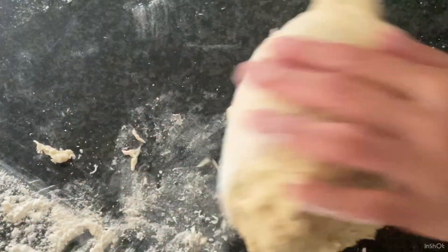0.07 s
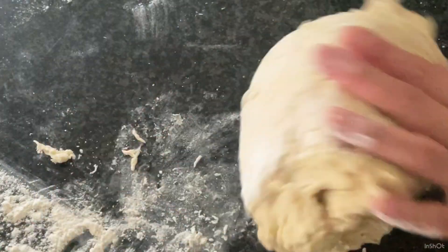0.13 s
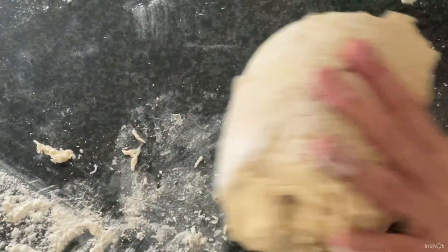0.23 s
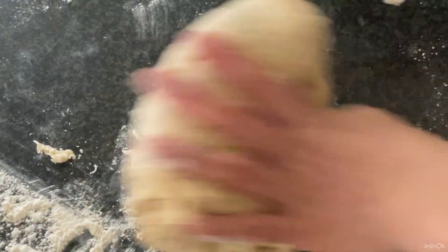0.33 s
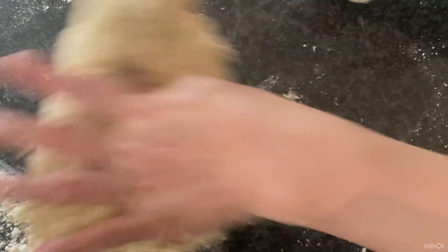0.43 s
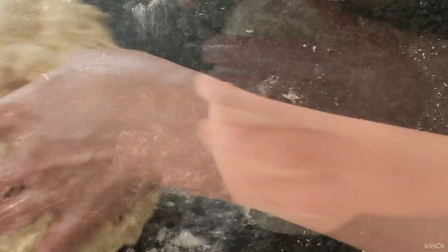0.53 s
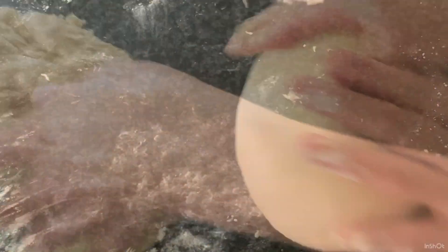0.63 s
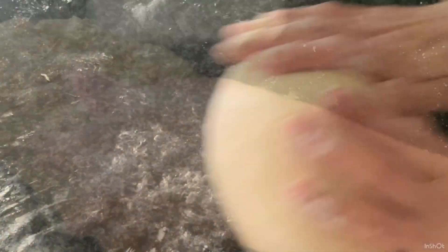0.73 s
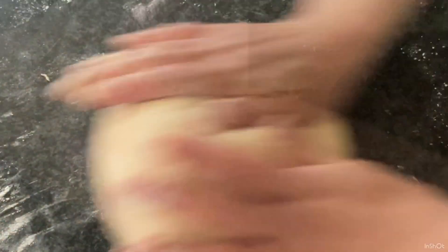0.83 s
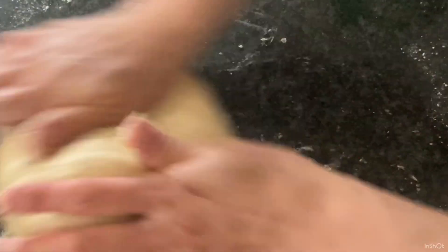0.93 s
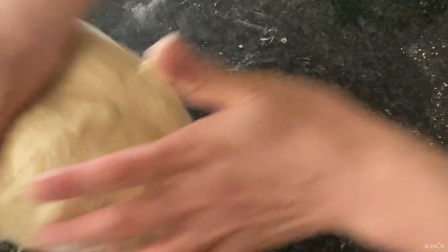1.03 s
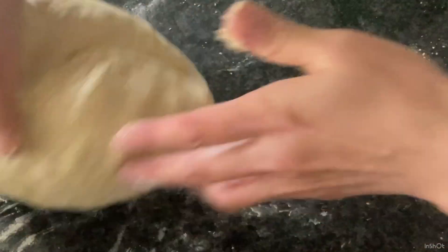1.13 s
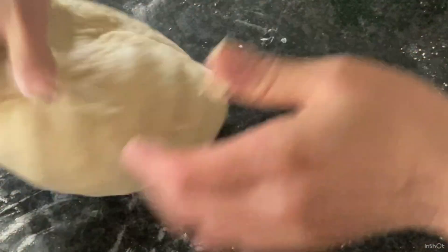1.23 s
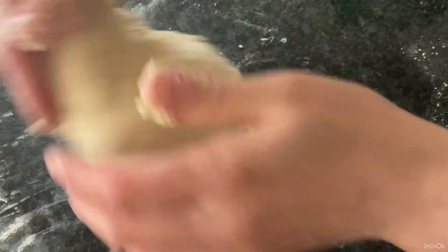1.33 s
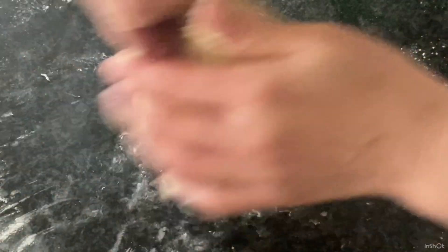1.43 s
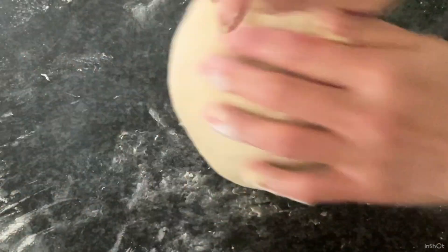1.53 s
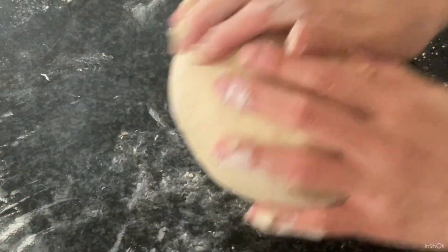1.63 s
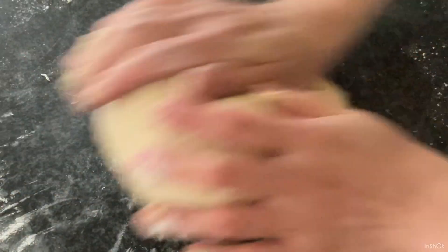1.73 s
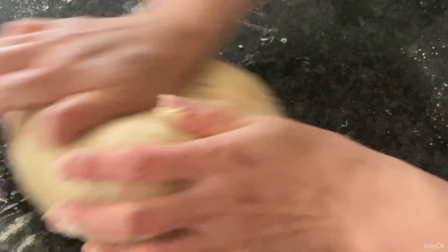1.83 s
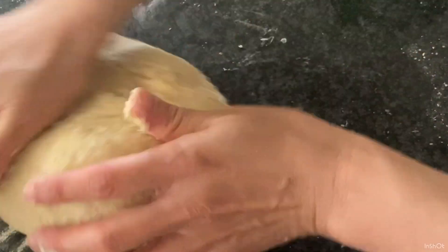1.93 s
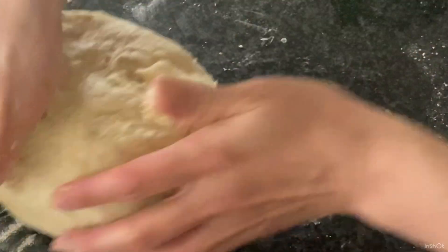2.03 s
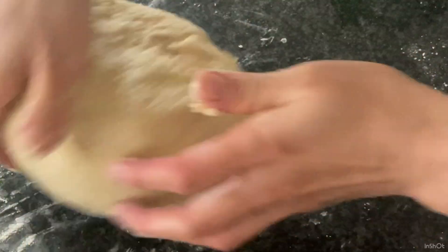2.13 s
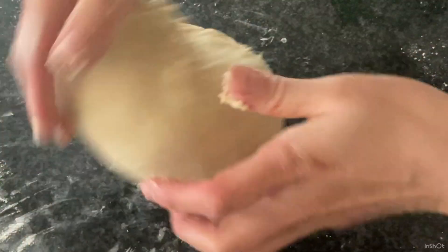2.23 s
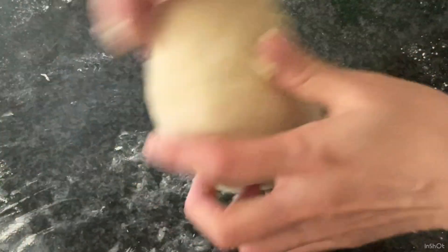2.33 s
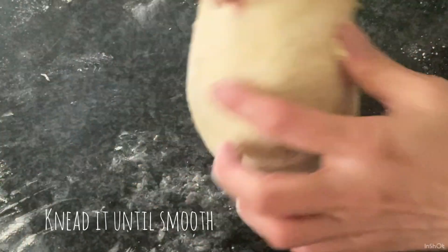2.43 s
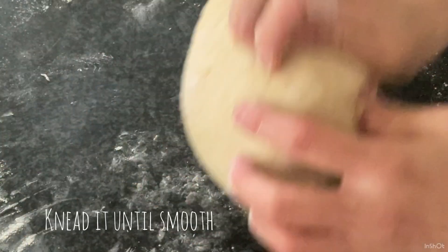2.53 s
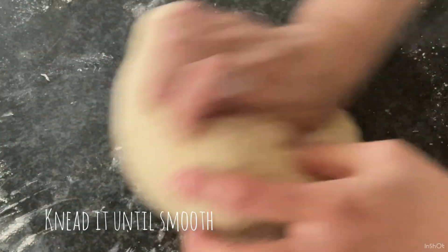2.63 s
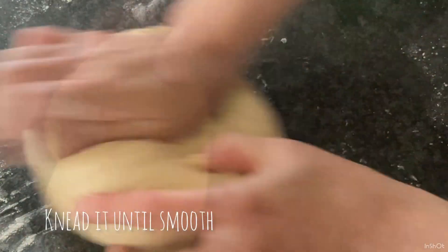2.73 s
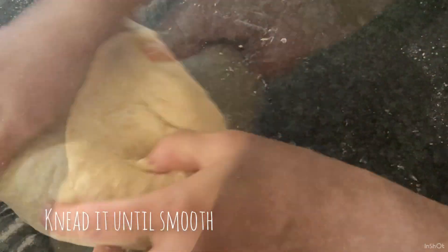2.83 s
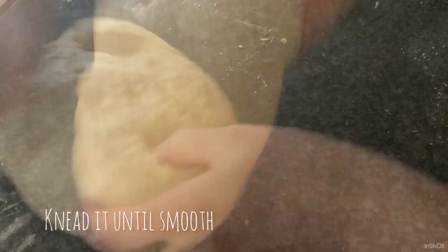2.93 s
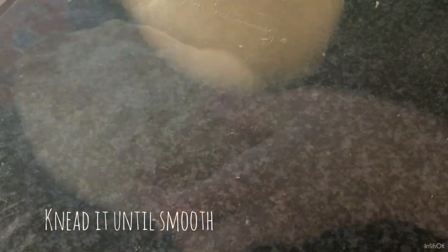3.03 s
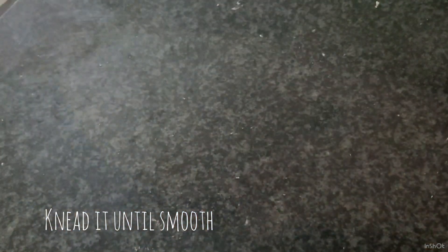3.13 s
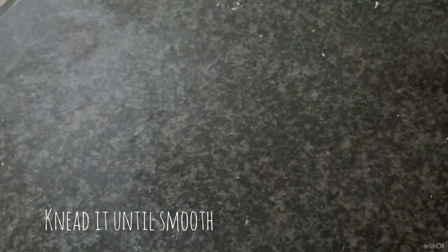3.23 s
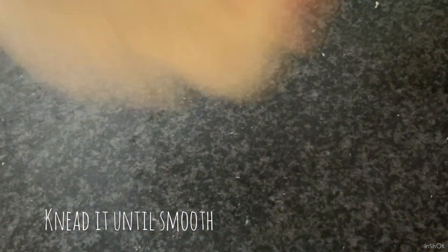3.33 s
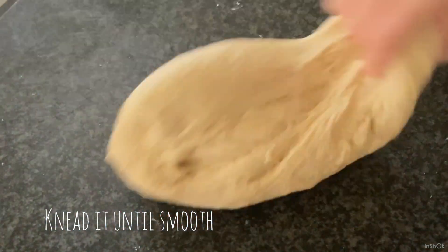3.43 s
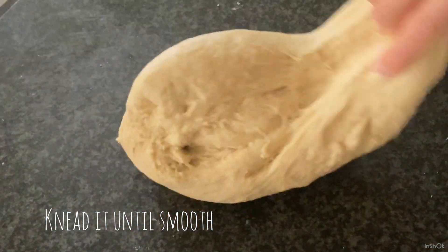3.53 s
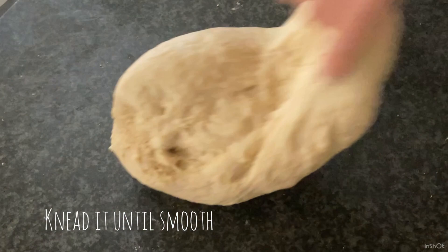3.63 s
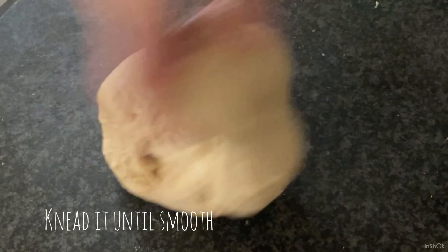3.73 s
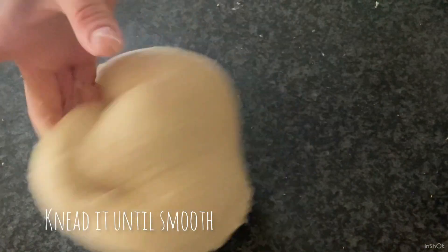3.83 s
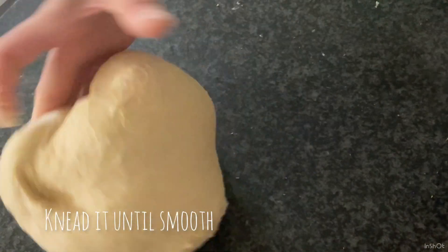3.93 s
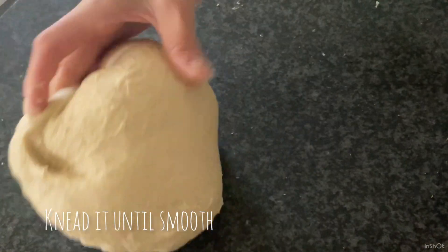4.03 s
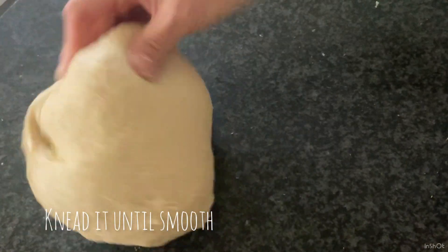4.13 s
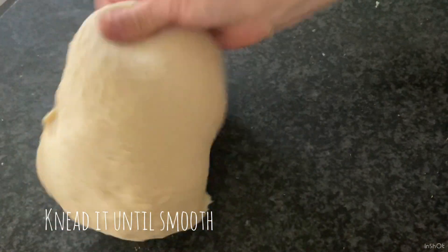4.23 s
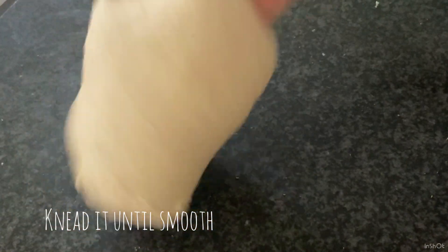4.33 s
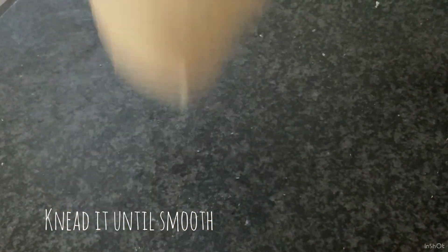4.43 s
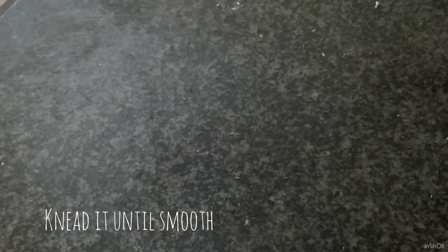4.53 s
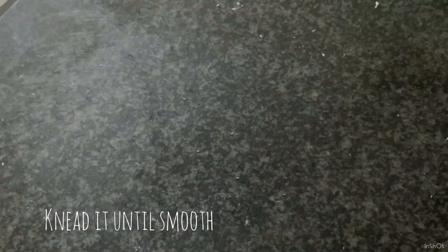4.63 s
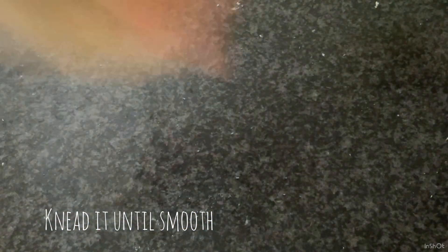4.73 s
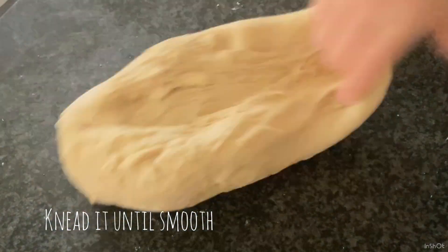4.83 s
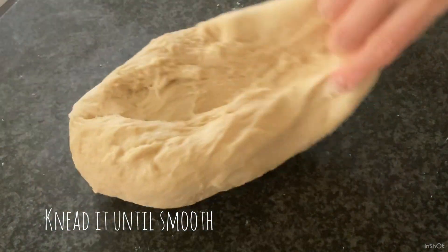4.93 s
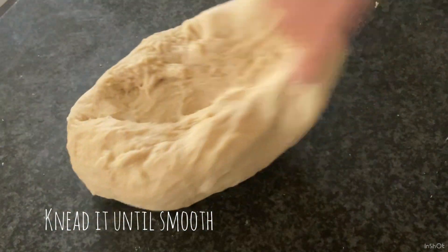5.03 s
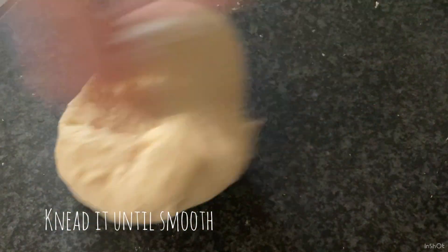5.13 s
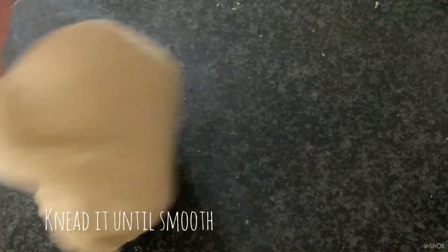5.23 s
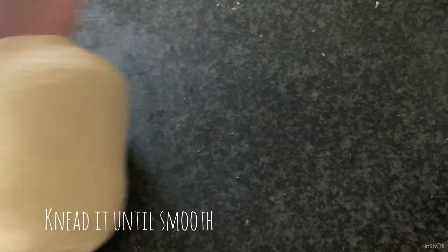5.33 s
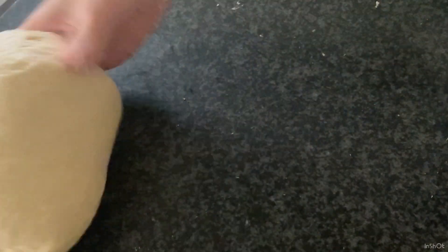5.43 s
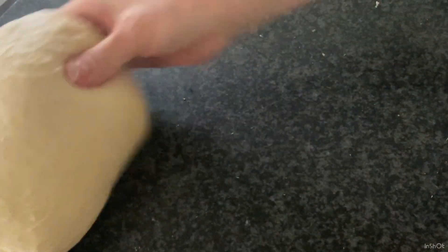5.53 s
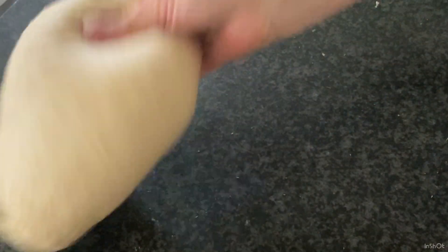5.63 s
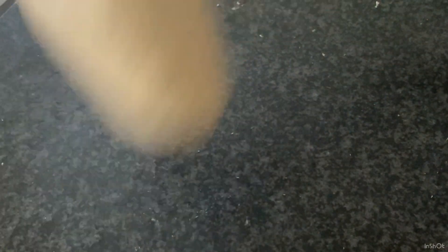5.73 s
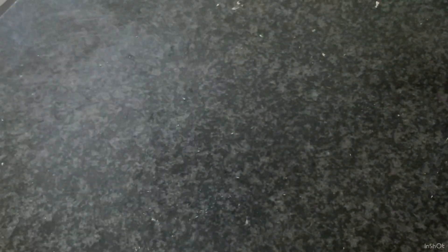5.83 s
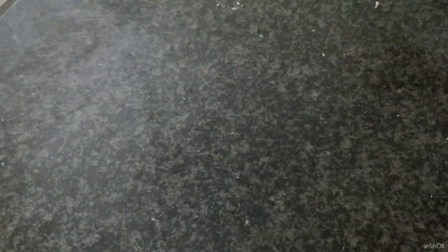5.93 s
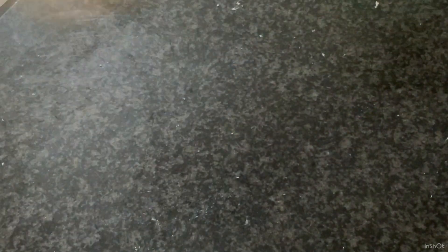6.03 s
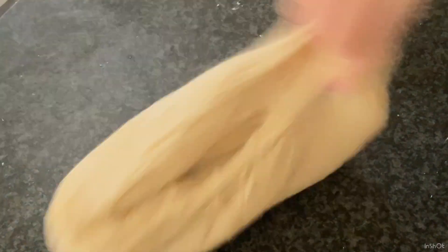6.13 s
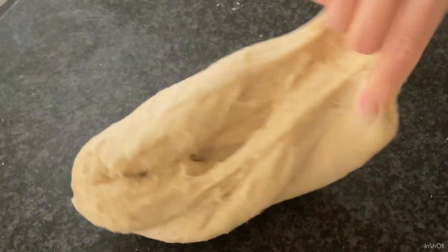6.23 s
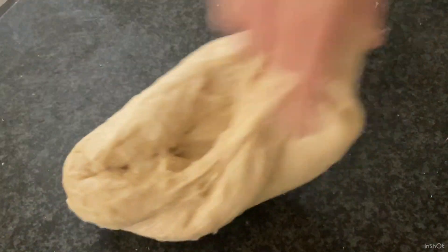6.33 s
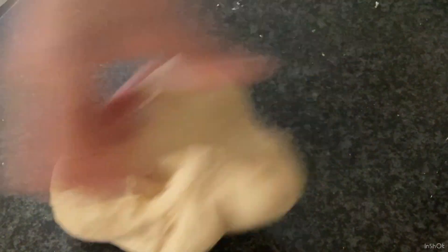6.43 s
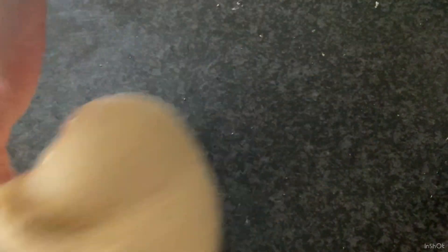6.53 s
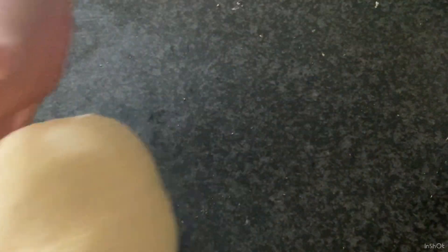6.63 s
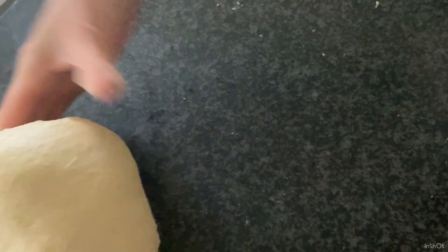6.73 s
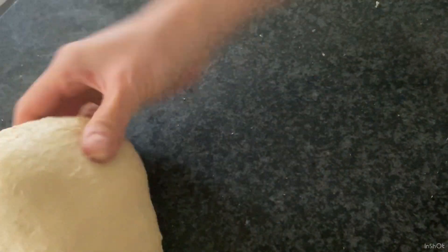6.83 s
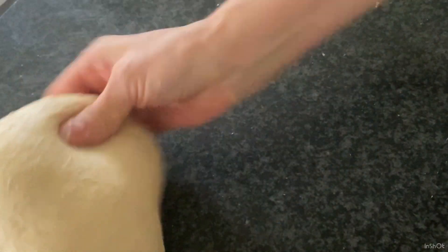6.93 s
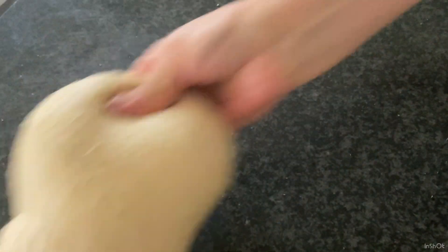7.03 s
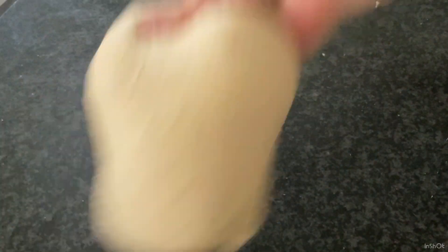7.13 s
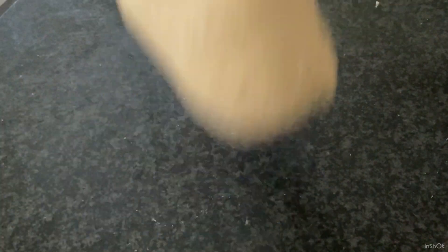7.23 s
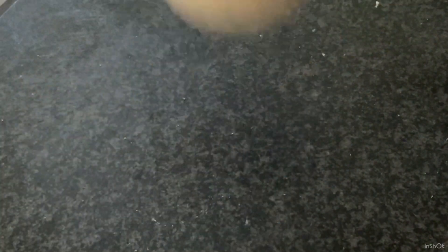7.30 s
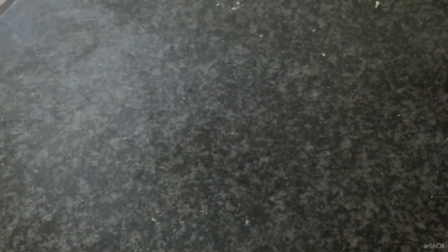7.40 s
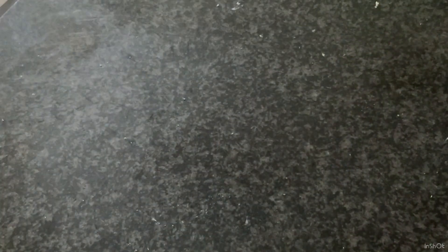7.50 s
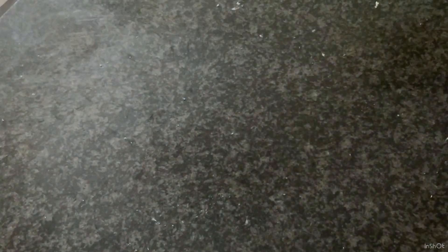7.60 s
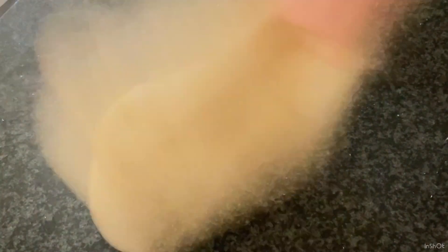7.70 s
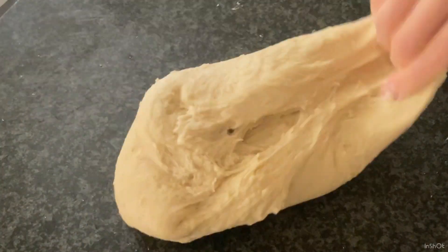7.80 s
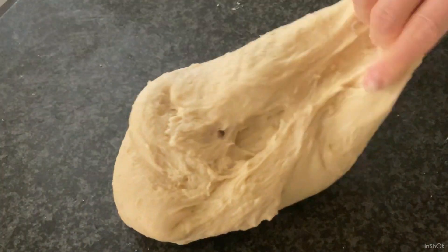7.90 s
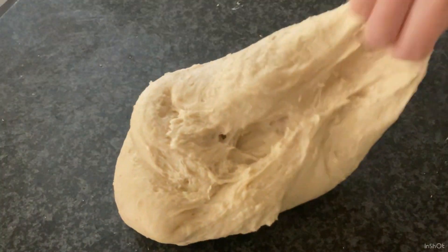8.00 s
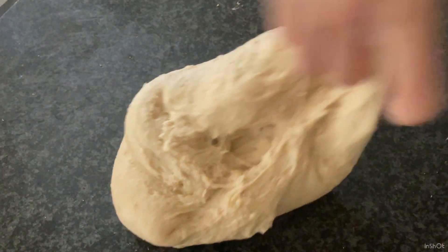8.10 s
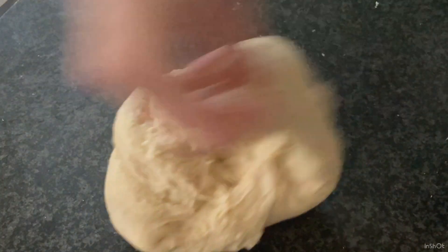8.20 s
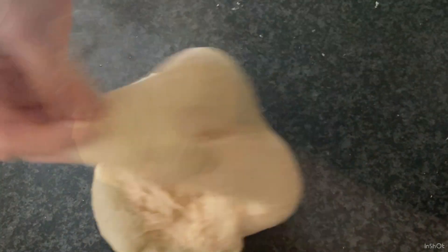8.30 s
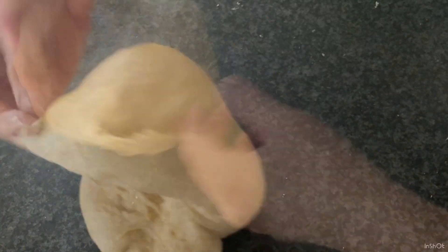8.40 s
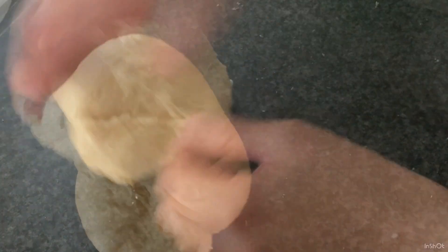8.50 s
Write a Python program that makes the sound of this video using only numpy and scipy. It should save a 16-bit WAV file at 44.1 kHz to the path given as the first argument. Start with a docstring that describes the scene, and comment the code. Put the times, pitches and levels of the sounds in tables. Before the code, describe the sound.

Hands quietly work sticky dough over a faint low hum, followed by four sharp, booming dough slams about a second and a half apart.

```python
"""Soft rubbing, pressing and pats of dough kneaded on a floured stone counter, over a low hum. Then four slams:
noise-burst skin cracks, gliding sine air pops, and a modal counter and room booming under the lump. Hands and
flour are shaped noise; pushed dough groans by stick-slip, and one stretch squeaks. A small hard-walled kitchen
answers with decaying noise in bands; two ports pick it all up."""
import sys
import numpy as np
from scipy import signal
from scipy.fft import rfft, irfft
from scipy.io import wavfile
from scipy.ndimage import uniform_filter1d

SR = 44100
rng = np.random.default_rng(int(sys.argv[2]) if len(sys.argv) > 2 else 0)


def persist_wave(psi):
    """Save psi, clipped to +-1, as 16-bit WAV."""
    counts = np.round(np.clip(psi, -1, 1) * 32767).astype(np.int16)
    wavfile.write(sys.argv[1], SR, np.atleast_2d(counts).T)


N = 377496


def amp(db):
    """Decibels to gain."""
    return 10 ** (np.asarray(db) / 20)


def unit(x):
    """Scale to rms 1."""
    return x / np.sqrt(np.mean(x ** 2))


def clock(length_s):
    """Sample times of a short sound, in s."""
    return np.arange(max(int(length_s * SR), 8)) / SR


def add(track, start_s, sound):
    """Mix a sound into the track at start_s."""
    i = max(int(start_s * SR), 0)
    track[i:i + len(sound)] += sound[:max(len(track) - i, 0)]


def across(points, size):
    """Join (Hz, value) points on a log axis, over the FFT bins of a signal of this size."""
    hz, value = np.transpose(points)
    return np.interp(np.log(np.fft.rfftfreq(size, 1 / SR) + 1), np.log(hz), value)


def band_share(table, centre_hz, size):
    """Weight of one row's band over the FFT bins; neighbouring bands crossfade and sum to 1."""
    return across([(row[0], float(row[0] == centre_hz)) for row in table], size)


def colour(x, points):
    """Filter a signal by (Hz, dB) points."""
    size = x.shape[-1]
    return irfft(rfft(x) * amp(across(points, size)), size)


def hiss(size, lo_hz, hi_hz):
    """Band noise of rms near 1, taken after the filter has settled."""
    sos = signal.butter(2, [lo_hz, hi_hz], "band", fs=SR, output="sos")
    return unit(signal.sosfilt(sos, rng.standard_normal(SR)))[-size:]


def walk(rate_hz, size=N):
    """Slow chance with a spread near 1: random knots joined by straight lines."""
    knots = rng.standard_normal(2048)
    return np.interp(np.arange(size) / SR * rate_hz, np.arange(len(knots)), knots)


def arch(t):
    """Smooth swell and fade over the times t."""
    return np.sin(np.pi * t / t[-1]) ** 2


def shove(length_s):
    """A soft push of unit impulse."""
    push = arch(clock(length_s))
    return push / push.sum()


def rasp(hz, width_hz):
    """A rough resonance of rms 1: a moving pitch widened by random modulation."""
    a, b = walk(2 * width_hz, len(hz)), walk(2 * width_hz, len(hz))
    phase = 2 * np.pi * np.cumsum(hz) / SR
    return unit(a * np.sin(phase) + b * np.cos(phase))


# side minus mid of diffuse sound: f/Hz, level/dB
DIFFUSE_WIDTH = [(90, -22), (200, -15), (400, -6), (700, -1.5), (1200, -5), (2000, -3), (3500, -9.5),
                 (9000, -13.5), (13000, -10.5)]


def diffuse(size):
    """Noise from all sides: alike at both ports in the bass, less alike higher up."""
    mid, side = rng.standard_normal((2, size))
    side = colour(side, DIFFUSE_WIDTH)
    return np.array([mid + side, mid - side])


# hum spectrum: f/Hz, relative density/dB per Hz
HUM_SPECTRUM = [(25, -17), (62, -3), (85, -7.5), (110, -10.5), (160, -6), (195, -1.5), (250, -11.5),
                (400, -24), (700, -32.5), (1600, -37), (2500, -41), (4000, -42), (8000, -50), (16000, -52)]
HUM_DB = -63


def background(waver_db=0.6):
    """Low, slightly wavering hum of the room: diffuse noise with most power in the bass."""
    return unit(colour(diffuse(N), HUM_SPECTRUM)) * amp(HUM_DB + waver_db * walk(10))


# kitchen bands: f/Hz, reverberant minus direct level/dB, t60/s
ROOM_BANDS = [(90, -9.5, .55), (262, -5, 0.55), (600, -3, 0.62), (1150, -5.5, 0.71), (1970, -9.5, .6),
              (5395, -8.5, 0.59), (8500, -6, .45), (12900, -5, 0.29)]


def kitchen(x, gap_s=0.002):
    """Dense reflections from tiles and cupboards, with their own level and decay in each band."""
    t = clock(0.95)
    spectrum, tail = rfft(diffuse(len(t))), 0
    for hz, db, t60_s in ROOM_BANDS:
        band = irfft(spectrum * band_share(ROOM_BANDS, hz, len(t)), len(t))
        rate = np.log(1000) / t60_s
        # the root makes the level independent of t60
        tail = tail + band * amp(db) * np.exp(-rate * t) * np.sqrt(2 * rate / SR)
    tail = tail * (1 - np.exp(-(t / gap_s) ** 2))
    return signal.fftconvolve(x[None], tail, axes=1)[:, :N]


# palm or dough sweeping through loose flour: t/s, length/s, level/dB
FLOUR_SWEEPS = [(0.64, .58, -65.5), (7.83, .14, -53)]


def flour():
    """Fine dry hiss of flour under a sliding palm or the stretching dough."""
    out = np.zeros(N)
    for start_s, length_s, db in FLOUR_SWEEPS:
        t = clock(length_s)
        add(out, start_s, amp(db) * np.sqrt(arch(t)) * hiss(len(t), 4600, 15000))
    return out * amp(2 * walk(20.8))


# a push bites quickly and eases; sliding stops sooner than pressure
PUSH_ATTACK_S, PUSH_SAG_DB_PER_S = 0.019, 11
SLIDE_RELEASE_S, PRESS_RELEASE_S = 0.044, 0.24


def stroke(length_s, release_s):
    """Effort of one push: a quick rise, a sagging hold and a release."""
    t = clock(length_s + 5 * release_s)
    rise = np.minimum(t / PUSH_ATTACK_S, 1)
    return rise * amp(-PUSH_SAG_DB_PER_S * t) * np.exp(-np.maximum(t - length_s, 0) / release_s)


# rubbing spectrum: f/Hz, relative density/dB per Hz
RUB_SPECTRUM = [(200, -3), (450, 6), (700, 4), (1500, 1.5), (3000, 1.5), (6000, -1), (9000, -4),
                (13000, -6.5), (16000, -12.5)]


def shifting(x, shift_db=2.2, rate_hz=18):
    """As the contact patch changes, each band of the rubbing swells and fades on its own."""
    spectrum, out = rfft(x), 0
    for hz, _ in RUB_SPECTRUM:
        band = irfft(spectrum * band_share(RUB_SPECTRUM, hz, N), N)
        out = out + band * amp(shift_db * walk(rate_hz))
    return out


# pressing spectrum: f/Hz, relative density/dB per Hz
PRESS_SPECTRUM = [(35, -13.5), (65, -2.5), (110, -2), (165, 0.5), (230, -12), (400, -29), (1500, -74)]
# hands brushing the dough lightly: t/s, length/s, level/dB
LIGHT_HANDLING = (.25, 2.65, -78)
# heel of the hand pushing the lump away: t/s, length/s, rubbing level/dB, pressing level/dB
HEEL_PUSHES = [(0.658, 0.4, -62, -58), (1.858, 0.3, -76.5, -64), (2.77, 0.062, -69, -60.5),
               (6.628, .25, -92.5, -59.5)]
# dough gathered, peeled or dragged over stone: t/s, length/s, level/dB,
# warmth/dB re level (high: skin, low: dry flour)
DOUGH_DRAGS = [(0.005, 0.12, -73, 0.5), (0.334, 0.14, -62, 2.5), (0.45, 0.28, -70.5, 1.5),
               (.88, 0.52, -69, -4.5), (1.21, 0.38, -79, -1.5), (1.455, .25, -66.5, 4.5),
               (1.67, 0.28, -63, 4), (1.98, 0.28, -75, -7), (2.55, .24, -68, 4.5), (2.81, 0.072, -68.5, 0),
               (3.01, 0.13, -69.5, -2), (3.52, .36, -70, -4), (4.171, 0.18, -61.5, 0.5),
               (4.571, .11, -67, -1), (4.95, .24, -68, -4), (5.483, .088, -67, -2), (5.571, .11, -61.5, -4),
               (5.859, 0.089, -65.5, -1), (6.73, 0.061, -72, -1.5), (6.87, 0.15, -77, 5),
               (7.008, 0.17, -65, -3.5), (7.781, .19, -46, -5), (8.345, 0.067, -70, 5)]


def friction(drag_press_db=-3, grain_db=3, slip_db=1.96, split_hz=1900):
    """Flour hisses and skin rubs warmly, in uneven steps of shifting colour; pressing rumbles."""
    dry, warm, load = np.zeros((3, N))
    start_s, length_s, db = LIGHT_HANDLING
    add(dry, start_s, amp(db) * np.ones_like(clock(length_s)))
    for start_s, length_s, rub_db, press_db in HEEL_PUSHES:
        add(dry, start_s, amp(rub_db) * stroke(length_s, SLIDE_RELEASE_S))
        add(load, start_s, amp(press_db) * stroke(length_s, PRESS_RELEASE_S))
    warm = warm + dry
    for start_s, length_s, db, warm_db in DOUGH_DRAGS:
        swell = amp(db) * np.sqrt(arch(clock(length_s)))
        add(dry, start_s, swell)
        add(warm, start_s, amp(warm_db) * swell)
        add(load, start_s, amp(drag_press_db + warm_db) * swell)
    grain_gain = amp(grain_db * np.minimum(rng.exponential(size=N), 7))
    grains = unit(shifting(colour(rng.standard_normal(N) * grain_gain, RUB_SPECTRUM)))
    skin = signal.sosfiltfilt(signal.butter(2, split_hz, fs=SR, output="sos"), grains)
    rubbing = (skin * warm + (grains - skin) * dry) * amp(slip_db * walk(40))
    pressing = unit(colour(rng.standard_normal(N), PRESS_SPECTRUM)) * load * amp(2 * walk(18))
    return rubbing + pressing


# hollow under a pushing palm: start f/Hz, rise/Hz per s, width/Hz, level/dB re rubbing, closing time/s
PALM_HOLLOW = (1220, 600, 200, -3.5, .14)


def palms():
    """The hollow under each pushing palm resonates, rising and dying away as the hand closes."""
    start_hz, rise_hz_per_s, width_hz, db, close_s = PALM_HOLLOW
    out = np.zeros(N)
    for start_s, length_s, rub_db, _ in HEEL_PUSHES:
        effort = stroke(length_s, SLIDE_RELEASE_S)
        t = np.arange(len(effort)) / SR
        resonance = rasp(start_hz + rise_hz_per_s * t, width_hz)
        add(out, start_s, amp(db + rub_db) * effort * np.exp(-t / close_s) * resonance)
    return out


# lump pushed, pulled back and folded: t/s, length/s, level/dB, slip rate f/Hz
LUMP_SHUDDERS = [(.95, .36, -60.5, 163), (1.475, .33, -56, 287), (5.402, .34, -66, 260),
                 (6.61, .079, -67, 300)]
# judder: rate wander/share, width/Hz, fall/dB per overtone
JUDDER_SHAPE = (.08, 50, 16)


def shudders(grit_db=-20, judder_db=3):
    """The lump sticks and slips at a wandering rate, with rough overtones and floury grit."""
    wander, width_hz, fall_db = JUDDER_SHAPE
    out = np.zeros(N)
    for start_s, length_s, db, rate_hz in LUMP_SHUDDERS:
        effort = stroke(length_s, SLIDE_RELEASE_S)
        hz = rate_hz * (1 + wander * walk(16, len(effort)))
        groan = sum(amp(-fall_db * k) * rasp((k + 1) * hz, (k + 1) * width_hz) for k in range(3))
        grit = amp(grit_db) * hiss(len(effort), 350, 830) * amp(judder_db * walk(100, len(effort)))
        add(out, start_s, amp(db) * effort * (groan + grit))
    return out * amp(judder_db * walk(25))


# scuff as the dough is swung up: t/s, decay/s, level/dB
SWING_SCUFF = (7.557, 0.071, -45.5)


def scuff():
    """A dull, sudden scrape: low-coloured noise that dies away."""
    start_s, decay_s, db = SWING_SCUFF
    out, t = np.zeros(N), clock(0.73)
    spectrum = [(70, -6.5), (190, 2.5), (420, -7.5), (900, -16.5), (2200, -20), (2800, -41), (6000, -54.5)]
    scrape = unit(colour(rng.standard_normal(len(t)), spectrum))
    add(out, start_s, amp(db) * scrape * np.exp(-t / decay_s))
    return out


# stretched dough on stone: t/s, length/s, start f/Hz, end f/Hz, level/dB
STRETCH_SQUEAK = (7.834, .064, 4900, 5650, -39)


def squeak(width_hz=520, slips_hz=100, depth=.6):
    """A brief, raspy stick-slip note that stutters and rises as the dough tightens."""
    start_s, length_s, start_hz, end_hz, db = STRETCH_SQUEAK
    out, t = np.zeros(N), clock(length_s)
    stutter = 1 - depth * np.sin(np.pi * slips_hz * t) ** 2
    note = rasp(np.linspace(start_hz, end_hz, len(t)), width_hz)
    add(out, start_s, amp(db) * arch(t) * stutter * note)
    return out


# pats and sticky ticks: t/s, level/dB, brightness/dB (low: flat palm, high: tacky skin letting go),
# clap/dB re level
HAND_PATS = [(0.234, -79, 11.5, 0), (0.654, -55.5, -9.5, 0), (1.858, -59.5, -10, -4), (1.885, -54.5, -1, 3),
             (2.776, -53.5, -7, 7), (3.127, -60.5, 8.5, 2), (3.73, -72.5, 9, 0), (4.135, -79, 7.5, -5),
             (4.187, -61, 3.5, 1), (4.322, -65, 1, 3.5), (4.646, -60.5, 2.5, -3), (4.736, -65, 5, -2.5),
             (5.358, -52, -12, 7), (5.574, -61, 1, 2), (5.659, -66.5, 7.5, -0.5), (6.94, -63.5, -0.5, 2.5),
             (7.48, -63.5, 4.5, 0.5)]


def pats(thud_db=3, tick_db=2, thud_s=0.014, clap_s=0.0079, tick_s=0.0048,
         start_hz=520, end_hz=140, glide_s=0.0055, soft_s=0.00088):
    """A dull knock falls in pitch as the dough gives, with a soft palm clap and a short sticky tick."""
    out, t = np.zeros(N), clock(0.32)
    hz = end_hz + (start_hz - end_hz) * np.exp(-t / glide_s)
    knock = np.sin(2 * np.pi * np.cumsum(hz) / SR)
    give = 1 - np.exp(-t / soft_s)
    for start_s, db, bright_db, clap_db in HAND_PATS:
        thud = amp(thud_db - bright_db) * knock * np.exp(-t / thud_s)
        clap = amp(clap_db) * hiss(len(t), 700, 1600) * np.exp(-t / clap_s)
        tick = amp(tick_db + bright_db) * hiss(len(t), 2500, 8000) * np.exp(-t / tick_s)
        add(out, start_s, amp(db) * (give * (thud + clap) + tick))
    return out


# bursting air pockets: level/dB re slam, mean delay/s, lowest f/Hz, highest f/Hz, decay/cycles
AIR_POCKETS = (-25, .02, 700, 4500, 3)


def pockets(count=9):
    """Wet little pops follow each slam as the lump flattens; higher ones tend to be weaker."""
    pocket_db, delay_s, lo_hz, hi_hz, cycles = AIR_POCKETS
    out, t = np.zeros(N), clock(.03)
    for start_s, db, *_ in SLAMS:
        delays_s = rng.gamma(2, delay_s / 2, count)
        for late_s, pitch, size in zip(delays_s, *rng.random((2, count))):
            hz = lo_hz * (hi_hz / lo_hz) ** pitch
            pop = np.sin(2 * np.pi * hz * t) * np.exp(-t * hz / cycles)
            strength = 2 * size * np.sqrt(lo_hz / hz) * np.exp(-late_s / delay_s / 2)
            add(out, start_s + late_s, amp(db + pocket_db) * strength * pop)
    return out


# counter and kitchen modes: f/Hz, level/dB, t60/s (the rows near 64, 129, 188 and 255 Hz stand between floor
# and ceiling)
BOOM_MODES = [(63.3, -25.5, .8), (64.2, -6, 0.25), (98, -4, 0.13), (129.3, -14.5, 0.45),
              (158.2, -23, .35), (188.3, -19, 0.32), (255, -12.5, .38), (301, -16, 0.45),
              (370.6, -14.5, 0.57), (455, -12.5, 0.25), (538, -15, 0.25), (582, -15, 0.74),
              (666, -15, 0.52), (880, -12, 0.41), (1186, -26, 0.54)]
# close modes beating: f/Hz above which complete, level scatter/dB, detuning/share,
# beat rate/per s, time to drift apart/s
MODE_CLUSTER = (350, 1.8, .009, 34, .06)


def counter(force):
    """Counter and room modes ring; neighbours swing oppositely, higher ones beat unevenly, anew at each call."""
    full_hz, scatter_db, detune, beat_rate, apart_s = MODE_CLUSTER
    t, ring = clock(1), 0
    for k, (hz, db, t60_s) in enumerate(BOOM_MODES):
        loose = min(hz / full_hz, 1)
        size, shift = loose * rng.standard_normal(2)
        apart = np.sqrt(loose) * (1 - np.exp(-(t / apart_s) ** 2))
        flutter = unit(walk(beat_rate, len(t))) * np.exp(1j * walk(beat_rate, len(t)))
        beats = np.sqrt(1 - apart) + np.sqrt(apart) * flutter
        swing = np.imag(beats * np.exp(2j * np.pi * hz * (1 + detune * shift) * t))
        ring = ring - (-1) ** k * amp(db + scatter_db * size - 60 * t / t60_s) * swing
    return signal.fftconvolve(force, ring)


# dough thrown down: t/s, strength/dB, crack decay/s, hollow clap/dB, pop start f/Hz, pop/dB, pop glide/s,
# splat middle/dB, counter tap/dB, weight/dB, landing time/s; tap, weight and pop add to strength
SLAMS = [(3.3732, -8, 0.0012, -4.5, 786, 2, 0.0026, -2, -22, -2.5, 0.0051),
         (4.7713, 0, 0.00074, 0.5, 1150, 1, .0026, 2, -18.5, -1, .005),
         (6.1, -3, .0019, -1.5, 1395, -2, .0026, 3, -21, 0, 0.0038),
         (7.7, -2, 0.0014, 4.5, 800, -1.5, 0.0024, -4, -23, 1, 0.0047)]


def booms(lag_s=.0066, pat_push_s=.005):
    """Each slam taps the counter at contact, then pushes it with the whole lump; pats push lightly."""
    out, patting = np.zeros((2, N))
    for start_s, db, *_, tap_db, weight_db, land_s in SLAMS:
        force = np.zeros_like(clock(2 * (lag_s + land_s)))
        add(force, 0, amp([tap_db]))
        add(force, lag_s - land_s / 2, amp(weight_db) * shove(land_s))
        add(out, start_s, amp(db) * counter(force))
    for start_s, db, bright_db, _ in HAND_PATS:
        add(patting, start_s, amp(db - bright_db) * shove(pat_push_s))
    return out + counter(patting)[:N]


def cupped(x, clap_db):
    """A hollow under the dough lifts (clap_db > 0) the middle of a slap and dulls its top, or the reverse."""
    return colour(x, [(600, 0), (1700, clap_db), (3300, 0), (13000, -.4 * clap_db)])


# gains added to slam strength
CRACK_DB, POP_DB, WALLS_DB = -3.5, -9.5, 13.5
# sound sent to the walls: f/Hz, level/dB
SPLAT_SPECTRUM = [(90, 1), (220, 13), (550, 9), (1000, 2.5), (1700, -0.5), (3700, -2.5), (6200, -3),
                  (9000, -7.5), (14000, -9)]


def splats():
    """Each slam reaches the walls as one smooth pulse and starts its own pattern of echoes."""
    out, pulse = 0, signal.unit_impulse(4096, "mid")
    for start_s, db, _, clap_db, _, _, _, flesh_db, *_ in SLAMS:
        sent = np.zeros(N)
        flesh = [(300, 0), (650, flesh_db), (1300, flesh_db), (2600, 0)]
        splat = cupped(colour(colour(pulse, SPLAT_SPECTRUM), flesh), clap_db)
        add(sent, start_s - len(pulse) / 2 / SR, amp(db + WALLS_DB) * splat)
        out = out + kitchen(sent)
    return out


def burst(t, decay_s):
    """A dense run of tiny contacts dying away, its noise spectrum evened out."""
    fade = np.exp(-t / decay_s)
    spectrum = rfft(rng.standard_normal(len(t)) * fade)
    power = uniform_filter1d(np.abs(spectrum) ** 2, size=90)
    even = irfft(spectrum / np.sqrt(power + 1e-12), len(t)) * np.sqrt(np.sum(fade ** 2))
    return even * np.exp(-(t / .03) ** 2)


# skin crack spectrum: f/Hz, level/dB
CRACK_SPECTRUM = [(300, -14.5), (900, 3), (1800, 3.5), (2450, -2.5), (3500, 2.5), (5000, -4), (6200, 1),
                  (9000, -5), (13000, -7), (16000, -9)]
# hanging end touching down before one slam: t/s, level/dB
END_TOUCH = (6.078, -39)


def slaps(end_hz=215, pop_s=.0055, spread_db=-21, spread_s=.007, touch_s=0.028, brush_db=-10):
    """The skin cracks on the stone; squeezed air pops, falling in pitch as the dough spreads."""
    out, t = np.zeros(N), clock(.12)
    for start_s, db, crack_s, clap_db, pop_hz, pop_db, glide_s, *_ in SLAMS:
        # padded in front so the filters can spread backwards
        crack = np.pad(burst(t, crack_s), len(t))
        crack = cupped(colour(crack, CRACK_SPECTRUM), clap_db)
        add(out, start_s - len(t) / SR, amp(db + CRACK_DB) * crack)
        hz = end_hz + (pop_hz - end_hz) * np.exp(-t / glide_s)
        pop = np.sin(2 * np.pi * np.cumsum(hz) / SR) * np.exp(-t / pop_s)
        # the rest of the lump flattens wetly
        spread = hiss(len(t), 180, 900) * np.exp(-t / spread_s) * t / spread_s
        add(out, start_s, amp(db + POP_DB + pop_db) * pop + amp(db + spread_db) * spread)
    start_s, db = END_TOUCH
    touch = rasp(np.linspace(330, 200, len(t)), 60) + amp(brush_db) * hiss(len(t), 2000, 9000)
    add(out, start_s, amp(db) * touch * np.exp(-t / touch_s))
    return out


def scene(boom_room_db=-8, pats_room_db=-1, rub_room_db=3):
    """Slams, booming counter and working hands share one kitchen; the squeak is close and dry."""
    boom, patting = booms(), pats() + pockets()
    rubbing = friction() + palms() + shudders() + flour() + scuff()
    sent = amp(boom_room_db) * boom + amp(pats_room_db) * patting + amp(rub_room_db) * rubbing
    walls = splats() + kitchen(sent)
    return slaps() + boom + patting + rubbing + squeak() + walls + background()


# response of both ports: f/Hz, level/dB
PORT_RESPONSE = [(8500, 0.5), (12500, -2)]
# left minus right: f/Hz, level/dB
PORT_TILT = [(200, 0), (380, 1.5), (650, 4.5), (1300, .5), (2400, 0)]
# left leads right: f/Hz, phase/rad
PORT_LEAD = [(50, .06), (250, .12), (620, .9), (1100, .6), (1350, 0), (2200, -1.7), (2450, -3.1),
             (2760, -4.3), (3750, -6.1), (5200, -6.9), (7000, -7.7), (9000, -9), (10700, -9.7),
             (12800, -11.5), (14200, -12.6)]


def record(dry, bass_cut_hz=44, top_hz=16100):
    """Two ports colour and delay the sound differently; deep bass is cut, peaks clip, the top is cut."""
    left_right = np.array([[.5], [-.5]])
    gain = amp(across(PORT_RESPONSE, N) + left_right * across(PORT_TILT, N))
    ports = gain * np.exp(1j * left_right * across(PORT_LEAD, N))
    wet = irfft(rfft(dry) * ports, N)
    wet = signal.sosfilt(signal.butter(6, bass_cut_hz, "high", fs=SR, output="sos"), wet)
    wet = np.clip(wet, -.9, .9)
    return signal.sosfilt(signal.ellip(8, .2, 70, top_hz, fs=SR, output="sos"), wet)


dry = scene()
out = record(dry)
persist_wave(out)
```